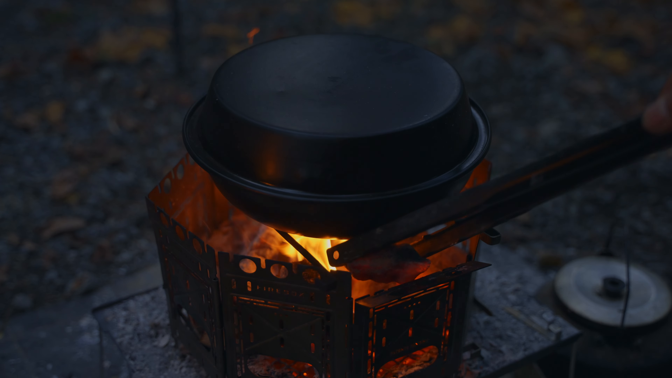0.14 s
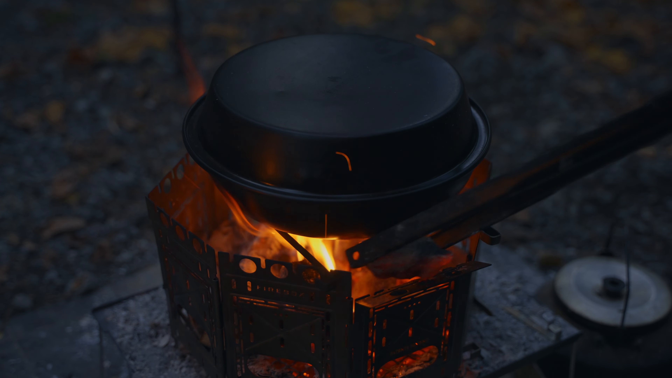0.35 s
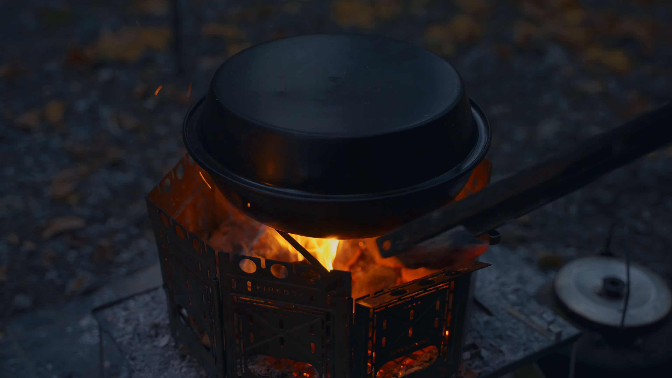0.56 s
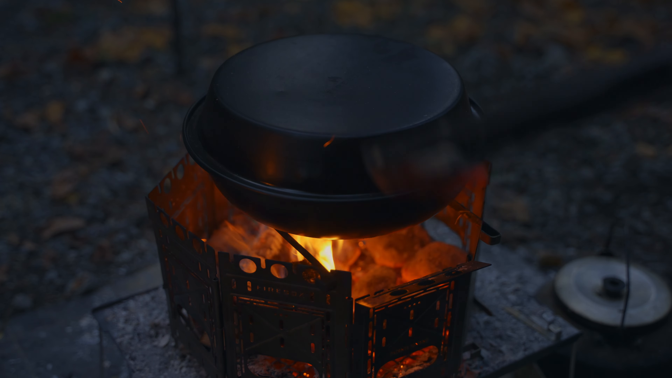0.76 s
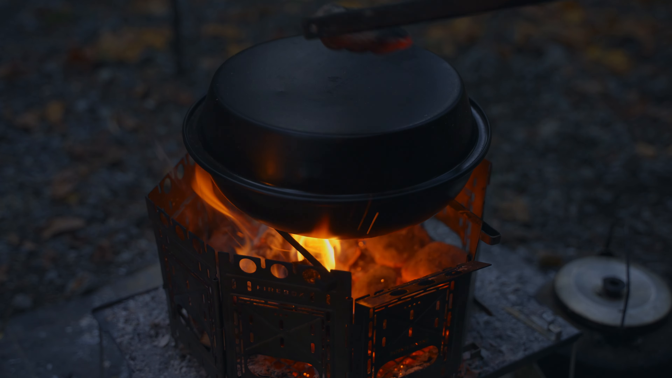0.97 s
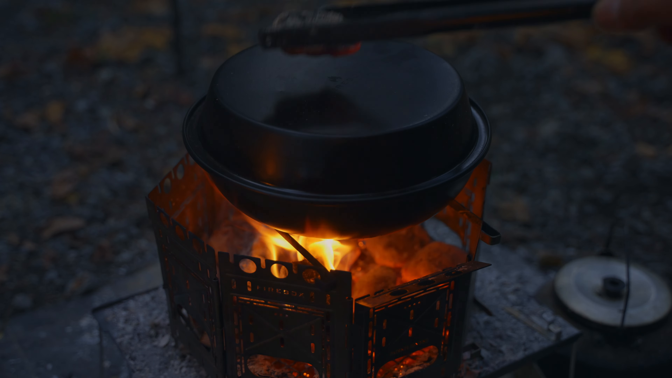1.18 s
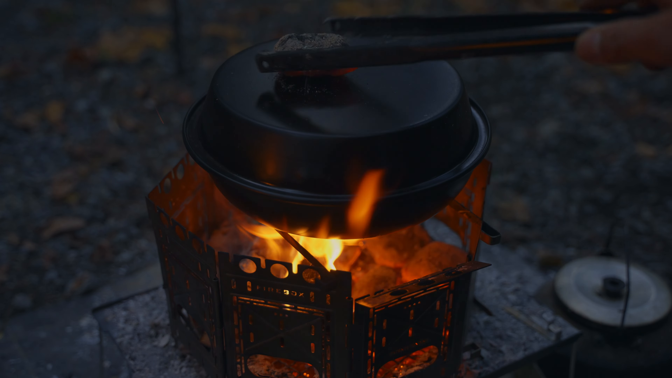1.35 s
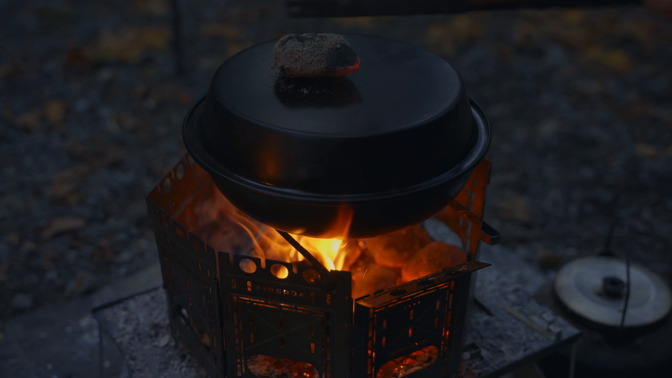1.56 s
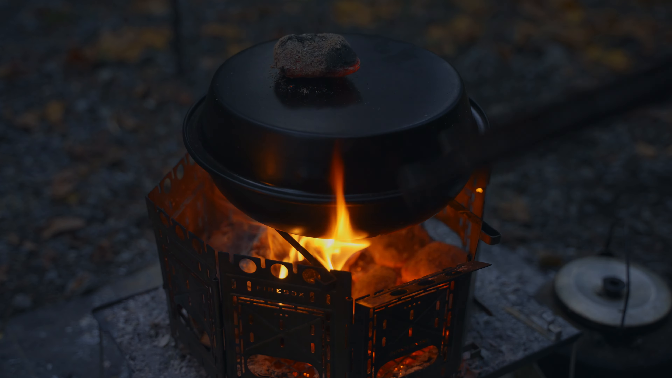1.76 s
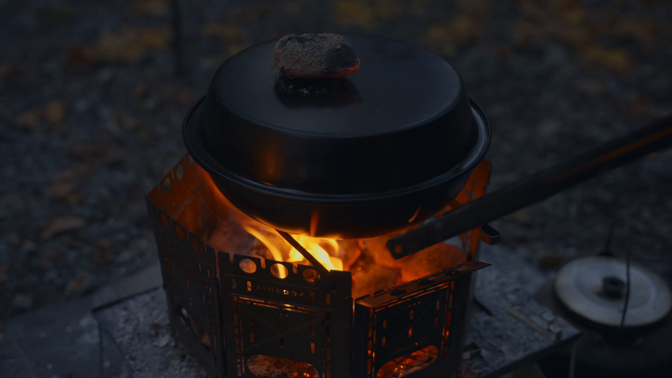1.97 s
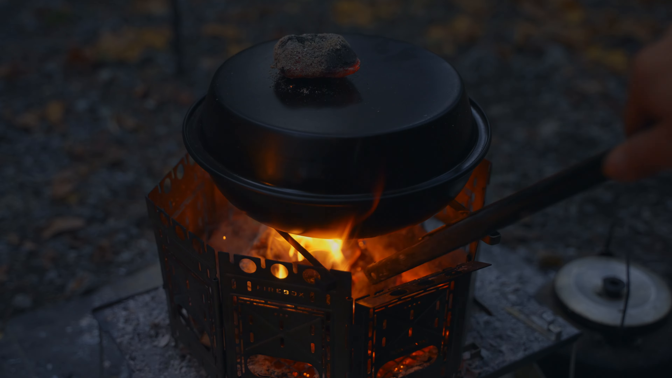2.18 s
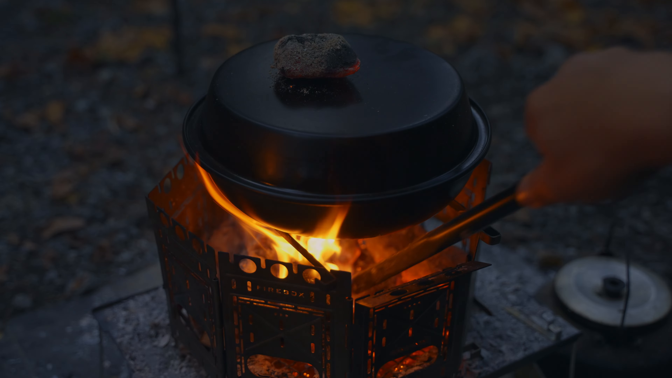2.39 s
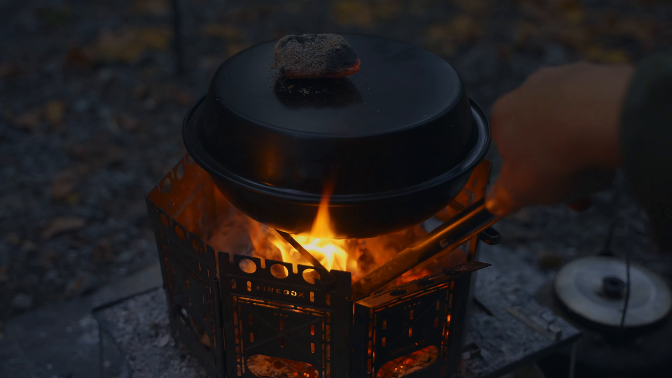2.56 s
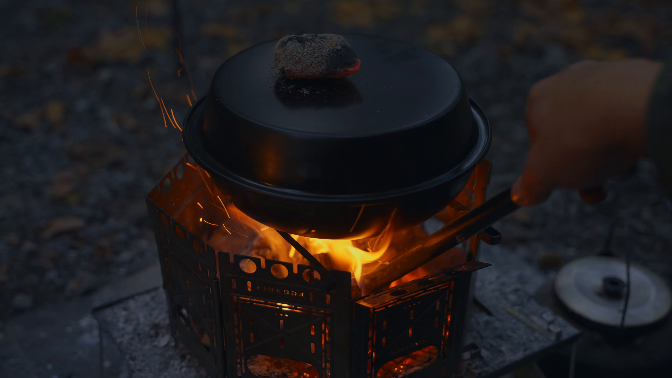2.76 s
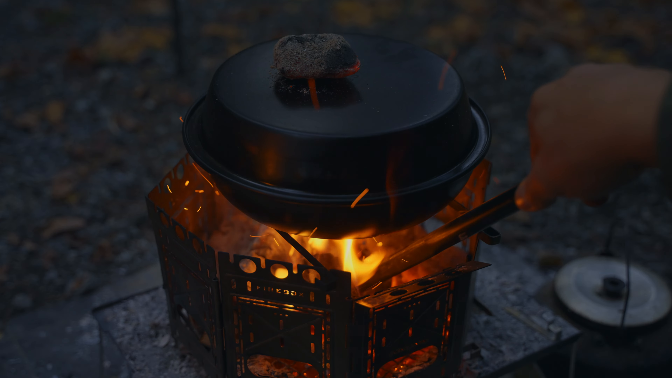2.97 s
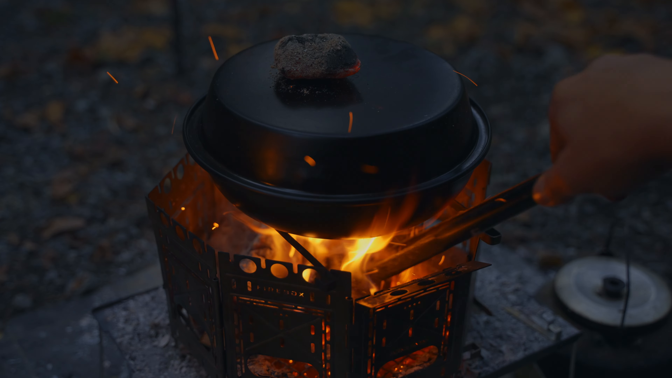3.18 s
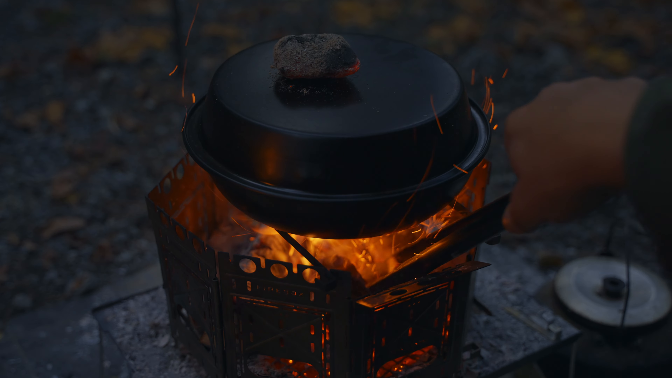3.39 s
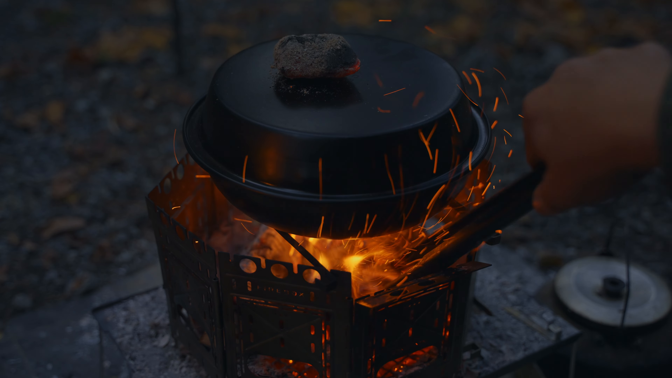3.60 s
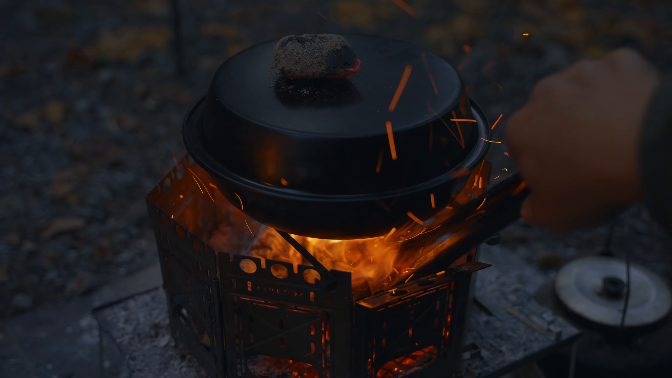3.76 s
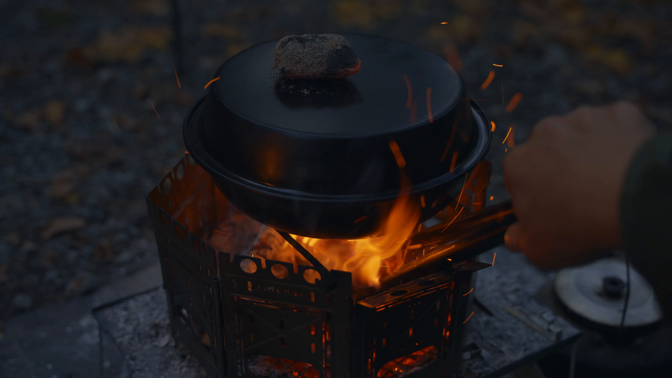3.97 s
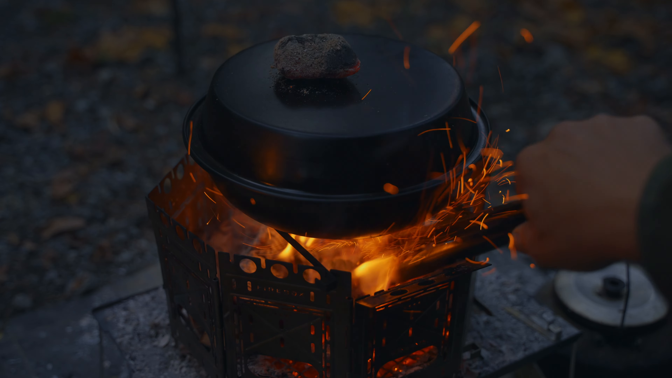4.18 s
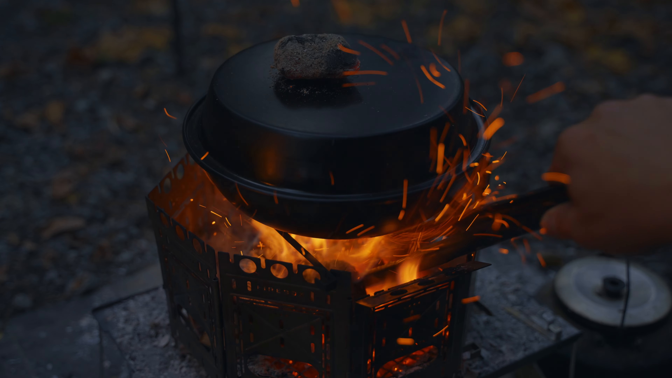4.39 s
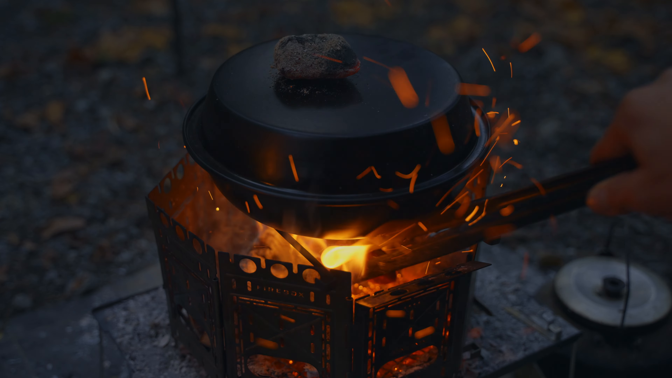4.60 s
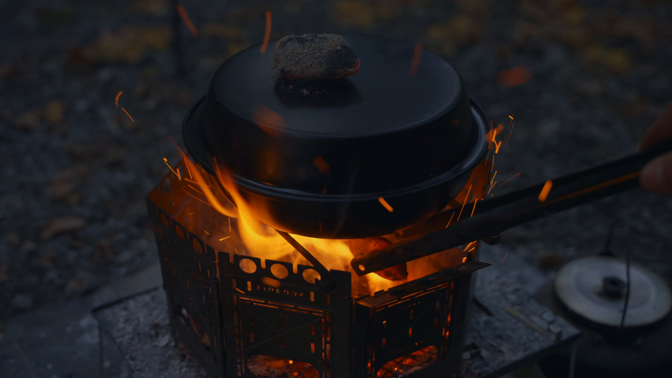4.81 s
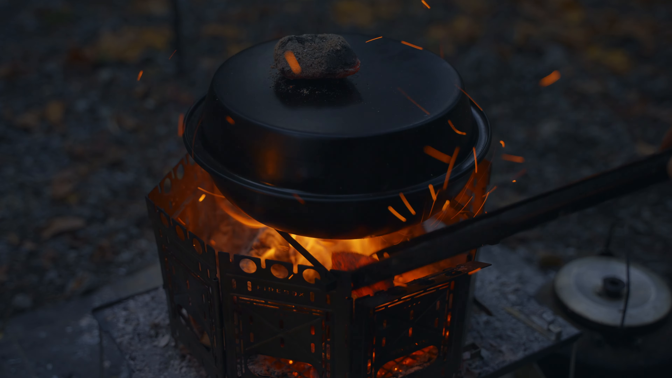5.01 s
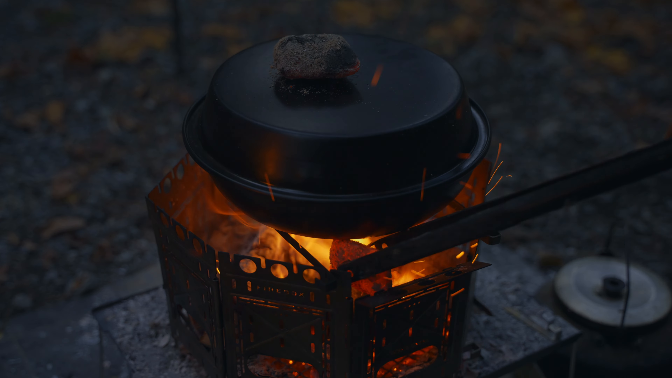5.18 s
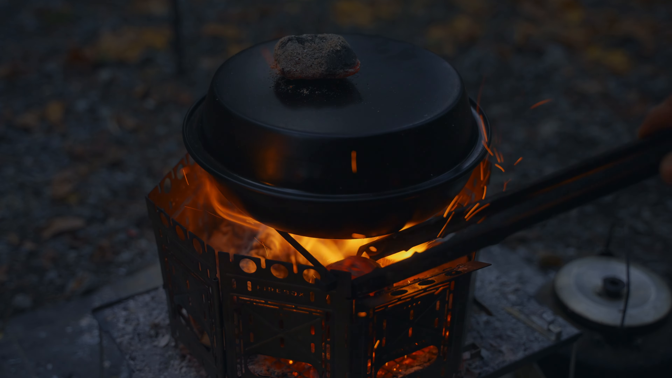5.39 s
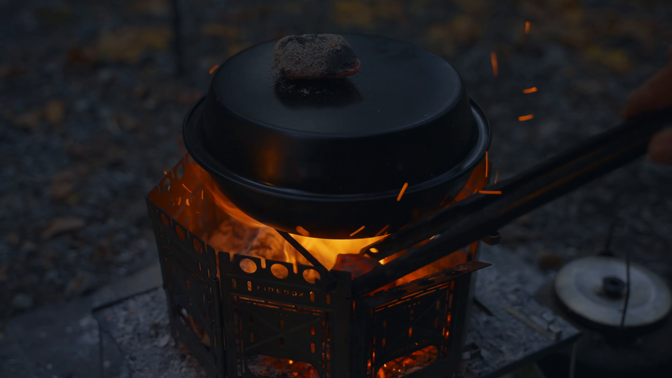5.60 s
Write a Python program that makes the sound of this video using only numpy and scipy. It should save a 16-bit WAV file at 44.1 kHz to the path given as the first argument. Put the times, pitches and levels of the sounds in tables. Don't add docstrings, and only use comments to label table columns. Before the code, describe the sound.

Tongs tick around an ember, drop it with a loud clank on an iron pan lid, then rake brittle charcoal in bright crackling bursts.

```python
import sys
import numpy as np
from scipy import signal
from scipy.fft import rfft, irfft
from scipy.io import wavfile
from scipy.ndimage import uniform_filter1d

SR = 44100
rng = np.random.default_rng(int(sys.argv[2]) if len(sys.argv) > 2 else 0)


def transcribe(signal):
    frames = np.atleast_2d(signal).T
    limited = np.clip(frames, -1, 1)
    pcm = np.round(limited * 32767).astype(np.int16)
    wavfile.write(sys.argv[1], SR, pcm)


def convert_level_to_amplitude(level_db):
    exponent = np.asarray(level_db, float) / 20
    return 10 ** exponent


N = 249165
TIME = np.arange(N) / SR


def unit(x):
    return x / np.sqrt(np.mean(x ** 2))


def colour(x, points):
    hz, db = np.transpose(points)
    bins = np.fft.rfftfreq(N, 1 / SR)
    gain = convert_level_to_amplitude(np.interp(np.log(bins + 1), np.log(hz), db))
    return irfft(rfft(x) * unit(gain), N)


def ring(x, hz, t60):
    radius = 1000. ** (-1 / (t60 * SR))
    angle = 2 * np.pi * min(hz, SR / 2.2) / SR
    return signal.lfilter([0, np.sin(angle)], [1, -2 * radius * np.cos(angle), radius * radius], x)


def noise_ring(x, hz, width):
    return np.sqrt(4 * np.pi * width / SR) * ring(x, hz, 2.2 / width)


def walk(rate):
    hold = int(SR / rate)
    levels = rng.standard_normal(N // hold + 1)
    return uniform_filter1d(np.repeat(levels, hold), hold)[:N]


def puff(start, t60, rise):
    i = int(start * SR)
    t = np.arange(min(int(.2 * SR), N - i)) / SR
    shape = (1 - np.exp(-t / max(rise, 1e-5))) * 1000. ** (-t / max(t60, 2e-3))
    return slice(i, i + len(t)), shape


def highpass(x, order, hz):
    return signal.sosfilt(signal.butter(order, hz, "high", fs=SR, output="sos"), x)


# frequency in [Hz], density in [dB per Hz].
HISS_COLOUR = [(18, -59), (30, -16), (42, -18), (75, -0.5), (145, -3), (287, -6), (345, -9), (449, -9),
               (740, -11), (1040, -12.5), (1350, -15), (4190, -18), (5170, -25.5), (8080, -25.5),
               (16000, -36)]
HISS_DB = -43.5


def hiss():
    noise = colour(rng.standard_normal(N), HISS_COLOUR)
    low = signal.sosfilt(signal.butter(2, 300, fs=SR, output="sos"), noise)
    flutter = low * (convert_level_to_amplitude(2.0 * walk(14)) - 1)
    return convert_level_to_amplitude(HISS_DB) * (noise * convert_level_to_amplitude(0.026 * walk(3.2)) + flutter)


# start in [s], peak in [dB], lowest mode in [Hz], t60 in
# [s].
DULL_KNOCKS = [(1.283, -18.5, 432, 0.13), (1.281, -18, 600, 0.11), (1.279, -34, 1290, .08),
               (1.281, -28, 1840, .1), (1.3, -42, 1497, .3), (1.325, -40, 1030, .3), (1.31, -32, 620, .2),
               (1.338, -37, 460, .2), (1.384, -31.5, 610, 0.065), (4.535, -40, 700, 0.06),
               (4.535, -42, 1000, .05), (3.593, -41, 680, 0.114), (4.534, -30, 530, 0.097),
               (5.01, -40, 590, 0.14), (5.39, -42, 540, .15), (5.134, -27, 526, 0.13),
               (5.165, -33.5, 520, 0.15)]
# start in [s], peak in [dB], lowest mode in [Hz], t60 in [s].
PAN_KNOCK = (1.3, -36, 248, .15)


def stove():
    out = np.zeros(N)
    for start, db, hz, t60 in DULL_KNOCKS + [PAN_KNOCK]:
        at, shape = puff(start, 0.0082, rise=0.0018)
        wave = np.cos(2 * np.pi * hz * np.arange(len(shape)) / SR)
        blow = convert_level_to_amplitude(db - 2.0) * shape * wave / np.sum(shape) * 2
        out[at] += ring(blow, hz, t60) + convert_level_to_amplitude(-23) * ring(blow, 1.99 * hz, t60 / 2)
    return out


# start in [s], blow in [dB], contact in [ms], grit in [dB].
BOUNCES = [
    (1.2781, -1.5, 1.25, -31),
    (1.2807, -15.5, 0.66, -21),
    (1.2844, -12, 1, -6),
    (1.286, -14.5, 0.85, -6.5),
    (1.2898, -9, 0.9, -6),
    (1.2954, -14, 0.96, -13),
    (1.2978, -11, 0.92, -27),
    (1.3031, -20, 0.75, -12),
]
# start in [s], level in [dB], pitch in [Hz].
CLINKS = [(1.3, -17.5, 3800), (1.2915, -11.5, 3240), (1.2945, -11.5, 5320), (1.3035, -13, 5500),
          (1.288, -18, 7700), (1.294, -17, 6160), (1.303, -24, 7000), (1.303, -19, 3240),
          (1.3165, -23, 4650), (1.287, -21, 4250), (1.279, -28, 5540)]
CLINK_SPREAD = 0.059
# level in [dB], t60 in [s].
LID_LOW_HZ = [140, 218, 432, 469, 581, 622, 679, 829, 882, 1033, 1291, 1361, 1500, 1818]
LID_LOW = [(1, 0.079), (11.5, 0.114), (-3, 0.17), (-15.5, 0.25), (-7, 0.18), (-19, 0.22), (13, 0.044),
           (-24, 0.08), (-23, 0.17), (-3, 0.21), (6, 0.074), (-10.5, 0.11), (-18, 0.16), (0, 0.34)]
# level in [dB], t60 in [s].
LID_HIGH_HZ = [3241, 3200, 3900, 4206, 4312, 4720, 4900, 5297, 5502, 6163, 7004, 6500, 7203]
LID_HIGH = [(-18, 0.15), (-8, 0.04), (-22, 0.06), (-10, 0.056), (-2, 0.04), (-17.5, 0.2), (-9, 0.031),
            (-10, 0.033), (-10, 0.07), (-8.5, 0.05), (-14, 0.06), (-22, 0.19), (-22, .1)]
# frequency in [Hz], density in [dB per Hz].
RATTLE_COLOUR = [(59, -37), (100, -10), (614, -7), (1030, -11), (1500, -10), (2300, -14.5), (6000, -19),
                 (8000, -27), (10400, -65), (17600, -120)]
RATTLE_DB, RATTLE_T60_S = -24.5, .28
LID_DB, SLAP_DB, GRIT_DB, GRIT_RAW_DB, GRIT_T60_S = -17.5, 4, -38.5, -39, 0.029
TWIN_HZ, TWIN_DB, TWIN_S, TWIN_T60_S, SETTLES_S = (2475, 2481.5), -30, 1.285, .5, 1.362


def lid():
    push, grit, rattle, tap = np.zeros((4, N))
    for start, db, contact_ms, grit_db in BOUNCES:
        phase = np.clip((TIME - start) / contact_ms * 1000 - .5, -.5, .5)
        push += convert_level_to_amplitude(db) * np.cos(np.pi * phase) ** 2
        at, shape = puff(start, GRIT_T60_S, rise=0.00057)
        grit[at] += convert_level_to_amplitude(grit_db) * shape
    grit = grit * rng.standard_normal(N)
    at, shape = puff(BOUNCES[0][0], RATTLE_T60_S, rise=0.0047)
    rattle[at] = shape * colour(rng.standard_normal(N), RATTLE_COLOUR)[at]

    slap = -np.gradient(push) * SR / 4000
    late = np.roll(push, int(.0005 * SR))
    low = sum(convert_level_to_amplitude(db) * ring(late, hz, t60) for hz, (db, t60) in zip(LID_LOW_HZ, LID_LOW)) / 20

    tap[int(TWIN_S * SR)] = convert_level_to_amplitude(TWIN_DB)
    high = sum(ring(tap, hz, TWIN_T60_S) for hz in TWIN_HZ) * (TIME < SETTLES_S)
    for hz, (db, t60) in zip(LID_HIGH_HZ, LID_HIGH):
        drive = convert_level_to_amplitude(GRIT_DB) * grit
        for start, clink_db, near_hz in CLINKS:
            octaves = np.log2(hz / near_hz)
            drive[int(start * SR)] += convert_level_to_amplitude(clink_db) * np.exp(-(octaves / CLINK_SPREAD) ** 2)
        high = high + convert_level_to_amplitude(db) * ring(drive, hz, t60)

    band = signal.butter(4, [1500, 7500], "band", fs=SR, output="sos")
    raw = signal.sosfilt(band, grit)
    whole = convert_level_to_amplitude(LID_DB) * low + convert_level_to_amplitude(SLAP_DB) * slap + high
    whole = whole + convert_level_to_amplitude(GRIT_RAW_DB) * raw + convert_level_to_amplitude(RATTLE_DB) * rattle
    return highpass(whole, 4, 120)


# start in [s], peak in [dB], mode in [Hz], t60 in [s].
SNAPS = [(.1245, -32, 13700, .02), (.3306, -27, 7000, .006), (.3215, -40, 11740, .08),
         (5.1514, -26, 7370, .04), (2.9342, -24, 15100, .03), (2.9343, -25, 13800, .033),
         (2.9344, -29, 12200, .027), (2.4785, -22, 13440, .02), (3.0736, -26, 13820, .025),
         (2.9714, -28, 15160, .02), (3.594, -32, 5750, .04), (3.5925, -22, 10200, .015),
         (2.68, -33, 4800, .015), (3.9057, -24, 13900, .02), (3.9058, -25, 10900, .02),
         (5.152, -32, 5550, .04)]
# start in [s], peak in [dB], mode in [Hz], t60 in [s].
PINGS = [(1.325, -43, 4720, .35), (1.332, -49, 5480, .3), (1.405, -47, 2478, .2), (1.318, -27, 10500, .03),
         (1.319, -29, 13600, .03), (1.319, -29, 14860, .03), (1.318, -33, 12000, .03),
         (1.743, -41, 10940, .05), (2.487, -36, 6370, .05), (2.5, -36, 6400, .04), (2.55, -38, 5000, .03),
         (2.571, -38, 4800, .03), (2.484, -32, 11900, .03), (3.164, -25, 10940, .04),
         (3.164, -30, 12320, .03), (3.164, -35, 15500, .03), (3.165, -33, 9000, .04),
         (3.213, -35, 9500, .03), (3.313, -39, 14940, .03), (3.385, -33, 11150, .05),
         (3.384, -38, 8700, .04), (3.592, -33, 7540, .05), (3.839, -35, 6900, .04),
         (3.839, -35, 13100, .03), (4.136, -40, 10500, .03), (4.174, -42, 5100, .05),
         (5.082, -32, 7190, .05), (5.15, -31, 11840, .04), (5.349, -38, 12660, .03),
         (5.362, -31, 6630, .03), (5.362, -38, 5560, .03), (5.401, -38, 15030, .02),
         (5.401, -39, 9860, .03), (5.431, -37, 7150, .03), (5.431, -37, 13520, .04),
         (5.431, -39, 14470, .03), (5.62, -39, 4690, .03), (5.617, -38, 6330, .05), (5.62, -35, 15250, .03),
         (.41, -42, 9900, .04)]


def single_modes():
    out = np.zeros(N)
    for rows, rise in [(SNAPS, .0003), (PINGS, .0015)]:
        for start, db, hz, t60 in rows:
            at, shape = puff(start, t60, rise)
            out[at] += convert_level_to_amplitude(db) * shape * np.sin(2 * np.pi * hz * np.arange(len(shape)) / SR)
    return out


# start in [s], length in [s], level in [dB], mode in [Hz], width in [Hz].
SQUEAKS = [(.1, .075, -52, 8745, 40), (.105, .04, -51, 9087, 50), (.245, .05, -55, 8745, 40),
           (.322, .025, -52, 14940, 100), (2.363, .03, -52, 11100, 80), (2.424, 0.03, -58, 8700, 80),
           (2.445, .035, -46, 14150, 60), (2.45, .03, -51, 9900, 120), (2.438, .04, -53, 10700, 100),
           (2.434, .05, -52, 16000, 80), (2.416, 0.045, -52.5, 12100, 80), (2.82, .06, -56, 13740, 100),
           (2.97, .025, -56, 5600, 80), (3.013, .03, -43, 13910, 120), (3.062, .018, -43, 13820, 120),
           (3.013, .035, -50, 12490, 120), (3.013, .035, -53, 10850, 120), (3.02, .025, -52, 7400, 100),
           (3.275, .03, -52, 10290, 100), (3.015, 0.065, -57, 3420, 60), (3.02, .07, -57, 5620, 70),
           (2.97, 0.1, -56, 3790, 60), (3.009, 0.094, -47, 6800, 200), (2.97, .028, -46, 15160, 120),
           (3.012, 0.04, -46, 15100, 150), (3.54, .05, -49, 12100, 90), (3.552, .05, -53, 5700, 100),
           (3.555, .04, -53, 5000, 80), (3.54, .03, -46, 15000, 150), (3.84, 0.125, -49, 7400, 200),
           (3.8, .06, -52, 10120, 120), (3.8, .03, -53, 14860, 120), (4.039, .11, -55, 13740, 150),
           (4.53, .07, -56, 9750, 120), (5.033, 0.066, -50, 11000, 150), (5.04, 0.065, -48, 9776, 90),
           (5.07, 0.03, -49, 8742, 90), (5.09, .1, -53, 5100, 80), (5.031, .06, -49, 13700, 150),
           (5.336, .12, -59, 8650, 80), (5.382, .07, -59, 8070, 80), (5.472, 0.049, -55, 10600, 150)]


def squeaks():
    out = np.zeros(N)
    friction = unit(rng.standard_normal(N) * convert_level_to_amplitude(2.5 * walk(120)))
    for start, length, db, hz, width in SQUEAKS:
        at = slice(int(start * SR), int((start + length + .08) * SR))
        drag = friction[at] * (TIME[at] < start + length)
        out[at] += convert_level_to_amplitude(db + 2) * noise_ring(drag, hz, width)
    return out


# start in [s], peak in [dB].
CLICKS = [(.3317, -25), (2.4795, -20), (2.5717, -25), (2.6806, -26), (3.2135, -29), (5.6168, -26),
          (3.3868, -27), (2.9354, -21), (3.0138, -26), (3.05, -27), (3.0744, -20), (3.1658, -19),
          (3.1675, -18), (3.3417, -27), (3.5938, -16), (3.9071, -17), (3.9541, -23), (5.1048, -24),
          (5.124, -24), (5.1293, -27), (5.1864, -21), (5.3642, -21), (5.4031, -27), (5.4326, -27),
          (5.4813, -24), (5.4965, -23)]


def splinters():
    out = np.zeros(N)
    for start, db in CLICKS:
        out[int(start * SR)] = convert_level_to_amplitude(db + 5)
    return highpass(out, 2, 6000)


# frequency in [Hz], density in [dB per Hz].
BRIGHT_COLOUR = [(4710, -35), (8000, -10.5), (10100, -3), (12000, -1), (12800, -6.5), (13700, 1.5),
                 (15700, -2.5), (16100, -36), (16400, -25)]
DULL_COLOUR = [(700, -0.5), (2000, -7.5), (3800, -9), (5000, 0.5), (7200, -1), (8200, -14), (9500, -8)]
# start in [s], peak in [dB], dull part in [dB], chip in [Hz].
TICKS = [(.1047, -25, -48, 9070), (.1251, -28, -47, 13700), (.1464, -34, -38, 9060),
         (.2194, -33, -46, 13900), (.2494, -33, -43, 9050), (.3306, -27, -42, 6600),
         (.3975, -32, -47, 9830), (.4993, -24, -26, 14700), (1.0311, -31, -43, 7200),
         (1.1942, -36, -51, 13500), (1.2784, -36, -14, 8820), (1.287, -22, -36, 10700),
         (1.3184, -15, -41, 13600), (4.4939, -18.5, -37, 12500)]
# start in [s], peak in [dB], dull part in [dB], chip in [Hz].
CRACKS = [(1.7429, -24.5, -37, 9960), (2.262, -31, -30, 11100), (2.4271, -28, -43.5, 14800),
          (2.481, -20, -28, 13400), (2.4994, -24, -23, 10900), (2.5164, -30, -28, 13900),
          (2.5478, -22, -26.5, 10900), (2.5708, -26, -25, 11000), (2.6795, -21, -41, 10630),
          (3.0128, -20, -39.5, 13900), (3.0344, -22, -32, 9700), (3.0736, -19, -36.5, 13800),
          (3.1649, -13, -29, 10300), (3.2128, -27, -29, 9400), (3.3405, -30, -25, 10900),
          (3.351, -24, -30, 11000), (3.5545, -21.5, -30, 13700), (3.5919, -9, -21, 11900),
          (3.9057, -13, -24, 14000), (3.928, -22, -25, 10200), (3.9526, -19, -30, 10900),
          (5.0337, -24, -32, 13500), (5.1514, -16, -40, 7370), (5.3634, -22, -22.5, 6780),
          (5.4013, -27, -29, 13800), (5.4313, -25, -29, 13200), (5.4951, -20, -40, 6970)]
# start in [s], peak in [dB], dull part in [dB], chip in [Hz].
CRUMBLES = [
    (3.384, -19, -36, 11150),
    (4.172, -23, -36, 11100),
    (5.083, -18, -33, 15100),
    (5.147, -13, -40, 7370),
    (5.179, -16, -40, 7340),
    (5.614, -20, -32, 13900),
    (3.58, -26, -36, 12000),
    (.317, -28, -42, 11740),
]
# start in [s], peak in [dB], chip in [Hz].
CRUMBS = [(2.2088, -29.5, 11000), (2.3642, -29, 11000), (2.45, -32, 14100), (2.8197, -42, 14000),
          (2.906, -35, 15000), (2.9339, -27, 13800), (2.9714, -25, 15300), (3.108, -28, 12100),
          (3.2362, -30, 13900), (3.2446, -22, 11000), (3.2861, -33, 10300), (3.3126, -25, 13700),
          (3.5416, -35, 14900), (3.79, -40, 10100), (3.8065, -28, 13500), (3.839, -23, 11200),
          (4.0983, -33, 13700), (4.1382, -31, 10300), (4.2205, -31, 6960), (4.2704, -37, 13600),
          (4.5084, -34, 11200), (4.5323, -29, 9700), (4.7249, -39, 9820), (4.8102, -40, 11900),
          (5.061, -23.5, 11800), (5.1265, -27, 10600), (5.329, -33, 7000), (5.3499, -22.5, 6900),
          (5.4702, -36, 6890), (5.4801, -27, 13800)]
CRUMB_DULL_DB = -21
DULL_STRETCH, DULL_RISE_S = 1.51, 0.003
CHIP_SLOPE = 0.28


def cracks():
    bright, dull, chips = np.zeros((3, N))
    noise = unit(rng.standard_normal(N) * convert_level_to_amplitude(2.1 * walk(450)))
    crumbs = [(start, db, db + CRUMB_DULL_DB, hz) for start, db, hz in CRUMBS]
    # rows, t60 in s, chip level in dB
    kinds = [(TICKS, 0.018, -10.5), (CRACKS, .036, -13), (crumbs, 0.044, -10), (CRUMBLES, .07, -13)]
    for rows, t60, chip_db in kinds:
        for start, db, dull_db, hz in rows:
            at, shape = puff(start, t60, rise=1.39 * t60 ** 2)
            bright[at] += convert_level_to_amplitude(db - 11.0) * shape
            dull[at] += convert_level_to_amplitude(dull_db - 7.5) * puff(start, DULL_STRETCH * t60, DULL_RISE_S)[1]
            chip_level = convert_level_to_amplitude(db + chip_db - CHIP_SLOPE * (db + 30) - 13)
            chips[at] += chip_level * ring(noise[at] * shape, hz, t60=.008)
    bursts = noise * bright
    return colour(bursts, BRIGHT_COLOUR) + colour(noise * dull, DULL_COLOUR) + chips, bursts


# time of full force in [s], hold in [s], bright grit in [dB],
# dull grit in [dB], plate ring share in [dB].
PUSHES = [(0, .01, -53.5, -50.5, -6), (0.094, 0.07, -51.5, -55, 2), (0.248, 0.073, -51.5, -53, 0),
          (.41, .005, -56, -56, -12), (1.297, 0.022, -47, -57, 4), (1.753, .005, -61, -61, -1),
          (2.26, .05, -74, -55, -5.5), (2.481, 0.078, -40.5, -44, -7), (2.697, .01, -52, -48, -7),
          (2.86, .02, -53.5, -65, -18), (2.978, .005, -51, -62, -12), (3.018, 0.045, -43.5, -64, -7.5),
          (3.197, 0.095, -52, -47.5, -8), (3.345, 0.012, -46, -44, -17), (3.39, .012, -44, -46, -14),
          (3.546, 0.062, -46, -40.5, -8), (3.823, 0.06, -43, -51, -7.5), (3.912, 0.04, -39, -43, -9),
          (3.991, 0.025, -48, -47, -19), (4.09, 0.17, -62, -53, -8), (4.54, .01, -50.5, -60, 1),
          (5.057, 0.057, -46, -66, -4), (5.15, 0.012, -39, -56, -7), (5.35, 0.16, -53, -55, -7),
          (5.645, .01, -43, -41, -11.5)]
ATTACK_DB_PER_S, RELEASE_DB_PER_S = 450, 271


def pushes():
    out = np.zeros((3, N))
    for start, hold, bright_db, dull_db, ring_db in PUSHES:
        before = (start - TIME) * ATTACK_DB_PER_S
        after = (TIME - start - hold) * RELEASE_DB_PER_S
        shape = convert_level_to_amplitude(-np.maximum(np.maximum(before, after), 0))
        out += convert_level_to_amplitude(np.array([[bright_db - 1.5], [dull_db - 5.0], [bright_db + ring_db - 3]])) * shape
    return out


# from in [s], to in [s], resting contact in [dB],
# ring share of cracks in [dB].
SPOTS = [
    (0, 0.503, -70, -4),
    (1.28, 1.37, -70, -9),
    (1.748, 1.818, -76, 9),
    (2.204, 2.8, -58, 1.5),
    (2.8, 3.167, -56.5, -2),
    (3.145, 3.76, -58.5, 1),
    (3.763, 4.464, -59, -0.5),
    (4.47, 5.03, -63.5, -12),
    (5.03, 5.65, -55.5, -1.5),
]
# mode in [Hz], width in [Hz],
# level in [dB].
FIRST_PLATES = [
    [(6600, 60, -15), (8745, 30, -8), (9080, 40, -6), (9820, 71, -13), (11740, 90, -19), (13700, 200, -6)],
    [(10400, 180, -4), (13700, 150, -3), (14900, 150, -6)],
    [(7200, 120, -2), (8800, 120, -6), (9960, 200, -15), (11100, 300, 2.5)],
    [(6570, 210, -11), (9700, 200, -13), (11000, 270, -4), (12100, 250, -4), (14100, 110, -4)],
]
# mode in [Hz], width
# in [Hz], level in [dB].
LATER_PLATES = [
    [(3400, 55, -18), (3790, 64, -9), (5700, 140, -10), (6780, 440, 1.5), (9600, 230, 2.5),
     (12500, 270, -21), (13800, 200, -5.5), (15100, 250, 5)],
    [(5100, 143, -18.5), (10300, 200, -7), (10900, 230, 0), (12100, 400, -6), (13800, 400, -3),
     (15000, 250, -8)],
    [(7400, 250, -5), (10300, 450, -5), (11200, 280, -5), (13800, 500, -4)],
    [(9700, 55, -4.5), (11200, 100, -8), (14400, 160, -9)],
    [(5307, 193, -13), (7030, 180, -1), (7370, 170, -1.5), (9670, 320, -4), (12400, 250, -19),
     (13600, 400, -14), (15100, 280, -15)],
]
REST_RING_DB = -8.5


def touched_plates(grains, ringing, crack):
    plates, resting = np.zeros((2, N))
    for (start, end, rest_db, share_db), modes in zip(SPOTS, FIRST_PLATES + LATER_PLATES):
        on = np.clip(np.minimum(TIME - start, end - TIME) / .004 + .5, 0, 1)
        resting += on * convert_level_to_amplitude(rest_db)
        force = on * (ringing + convert_level_to_amplitude(rest_db + share_db + REST_RING_DB))
        at = slice(max(int((start - .01) * SR), 0), int((end + .1) * SR))
        for hz, width, db in modes:
            touch = convert_level_to_amplitude(3.5 * np.roll(walk(45), -rng.integers(SR))[at])
            drive = (grains * force)[at] * touch + convert_level_to_amplitude(share_db - 6.5) * (on * crack)[at]
            plates[at] += convert_level_to_amplitude(db) * noise_ring(drive, hz, width)
    return plates, resting


def spurts(grit):
    place = np.clip(np.fft.rfftfreq(N, 1 / SR) / 900 - 4, 0, 13)
    lines, out = rfft(grit), 0
    for k in range(14):
        band = lines * np.cos(np.pi / 2 * np.clip(place - k, -1, 1)) ** 2
        out = out + irfft(band, N) * convert_level_to_amplitude(2.2 * walk(90) + 0.5)
    return out


def rake(crack):
    grains = unit(rng.standard_normal(N) * convert_level_to_amplitude(1.2 * walk(72) + 3.0 * walk(700)))
    bright, dull, ringing = pushes()
    plates, resting = touched_plates(grains, ringing, crack)
    grit = colour(grains * (bright + resting), BRIGHT_COLOUR) + colour(grains * dull, DULL_COLOUR)
    return spurts(grit) + plates


def scene():
    crackle, bursts = cracks()
    background = hiss() + stove() + lid()
    touches = single_modes() + squeaks() + splinters()
    return np.tile(background + touches + crackle + rake(bursts), (2, 1))


def roll_off(x):
    return signal.sosfilt(signal.butter(12, 16820, fs=SR, output="sos"), x)


def record(dry):
    top = signal.ellip(10, .2, 70, 15820, fs=SR, output="sos")
    mix = np.clip(signal.sosfilt(top, dry), -1, 1)
    return roll_off(mix)


dry = scene()
out = record(dry)
transcribe(out)
```